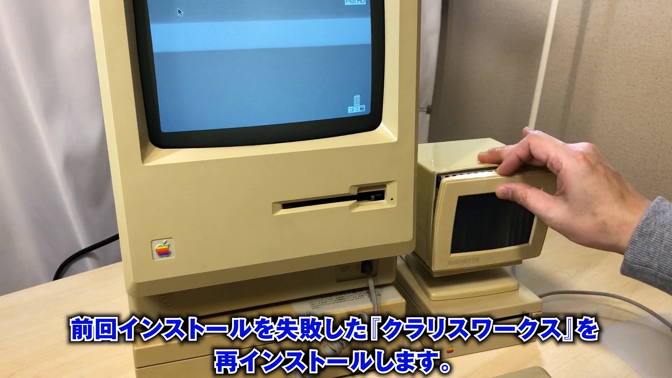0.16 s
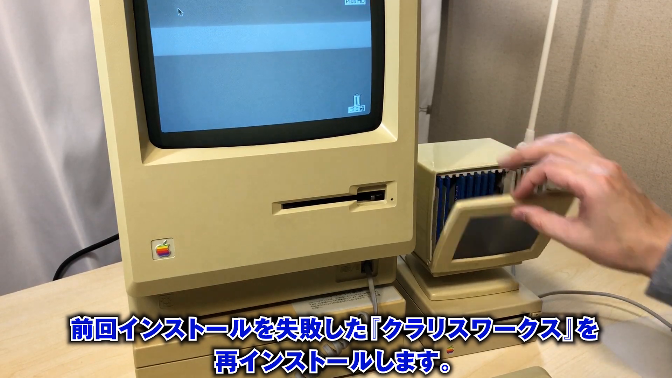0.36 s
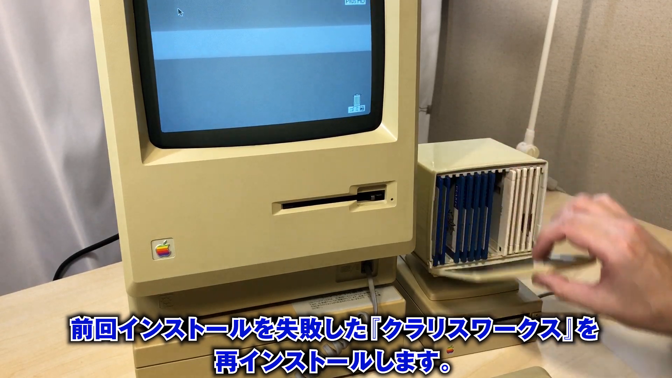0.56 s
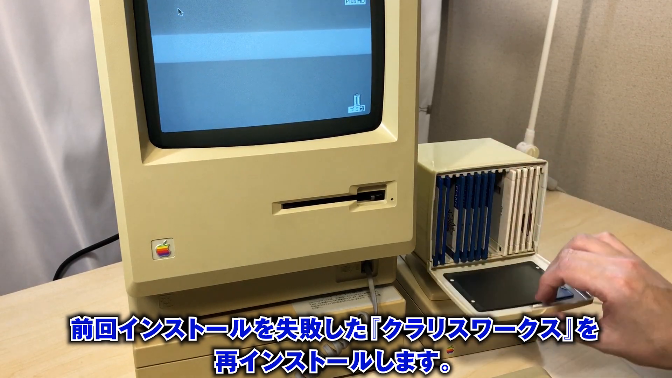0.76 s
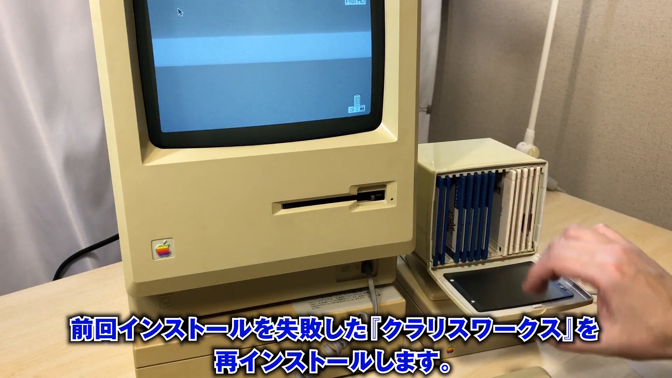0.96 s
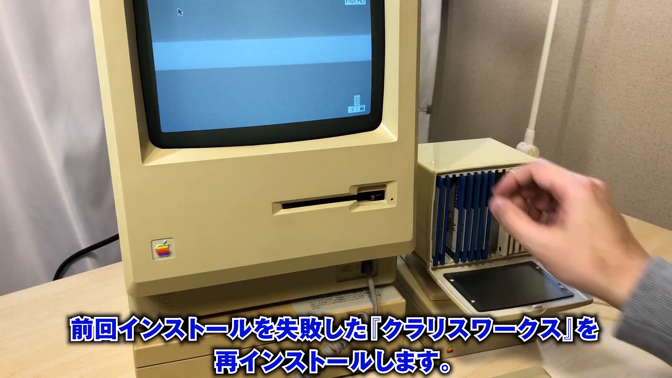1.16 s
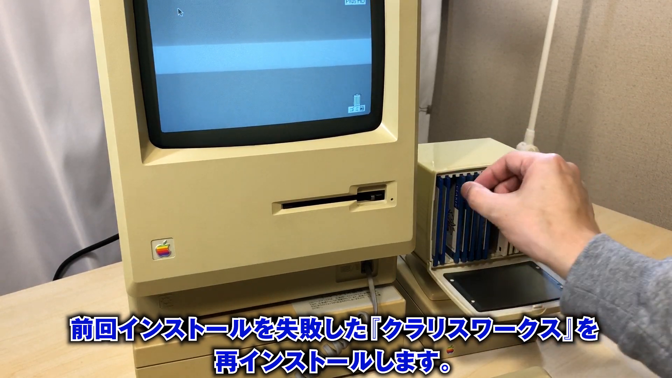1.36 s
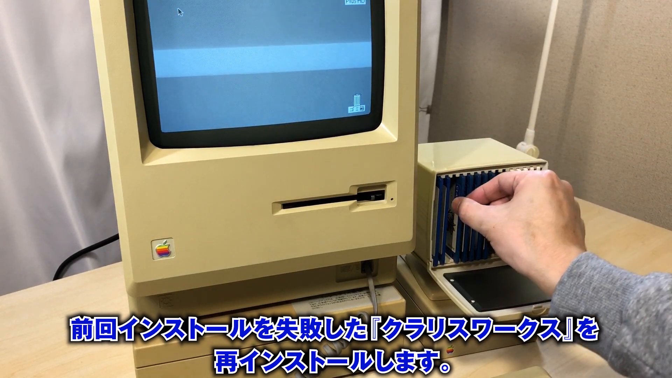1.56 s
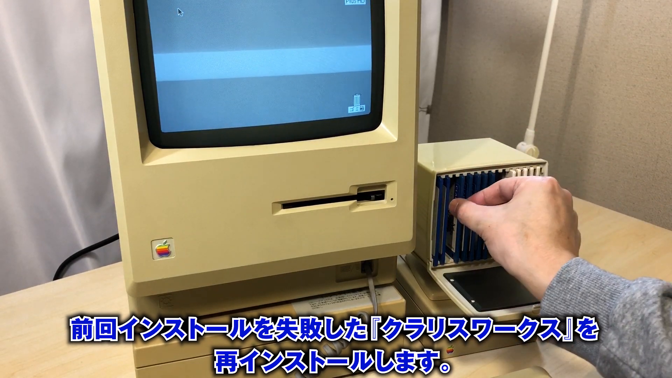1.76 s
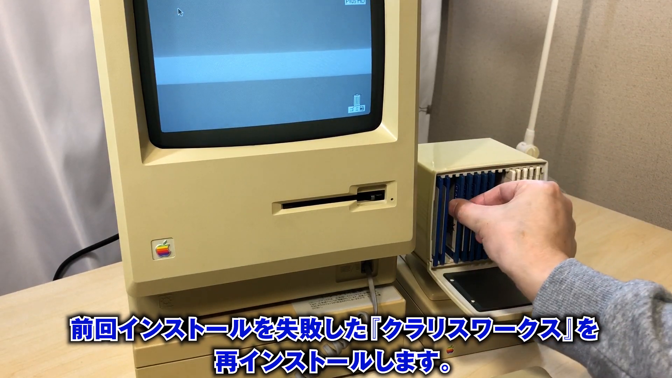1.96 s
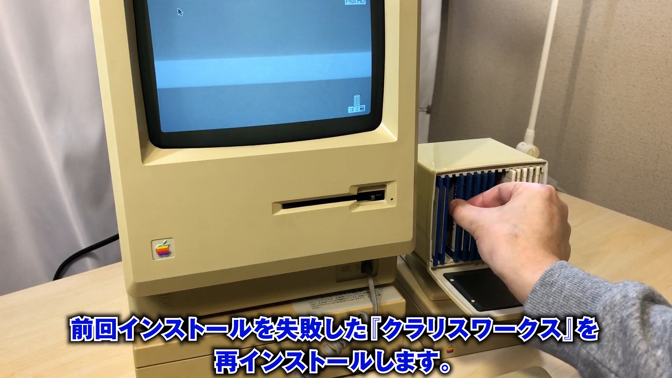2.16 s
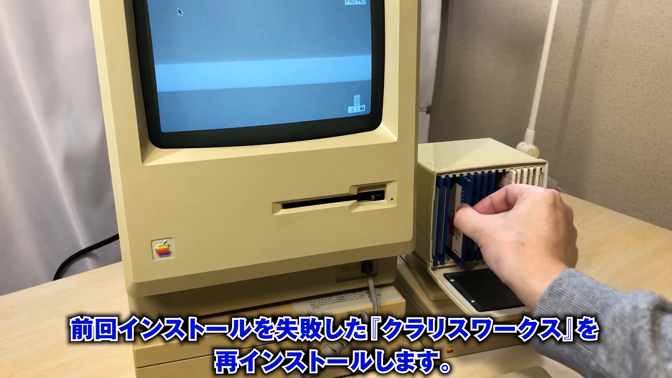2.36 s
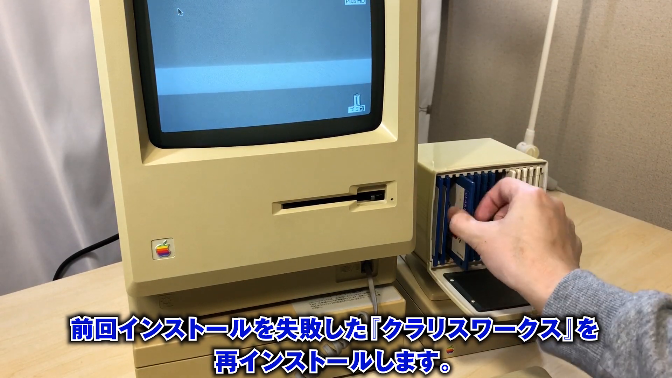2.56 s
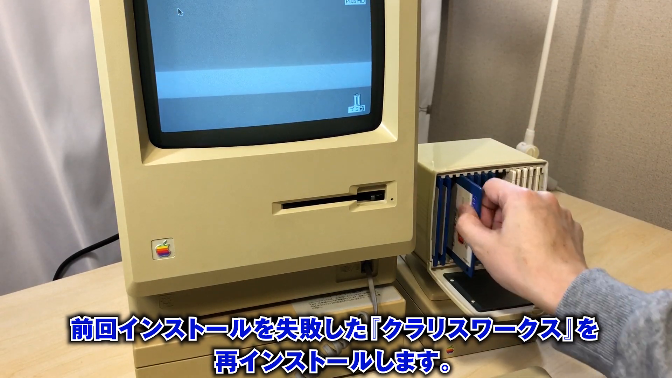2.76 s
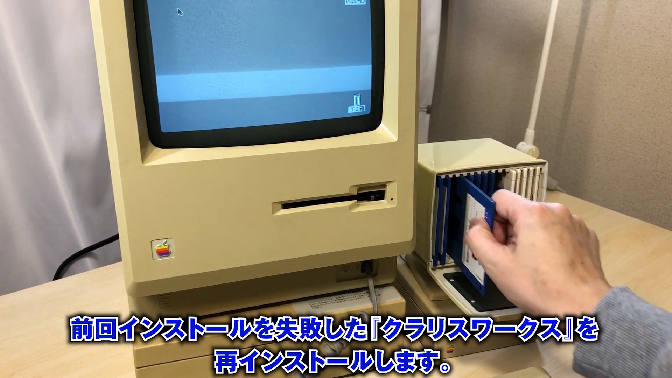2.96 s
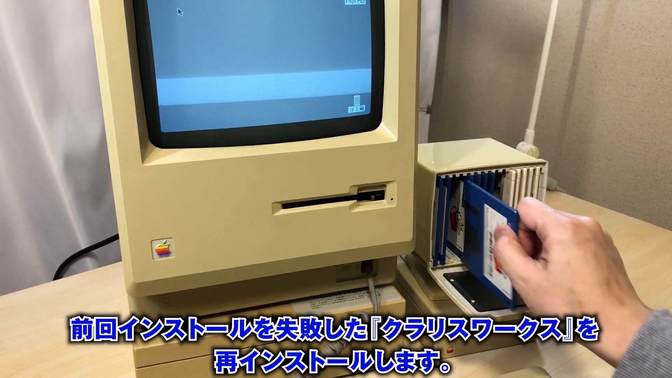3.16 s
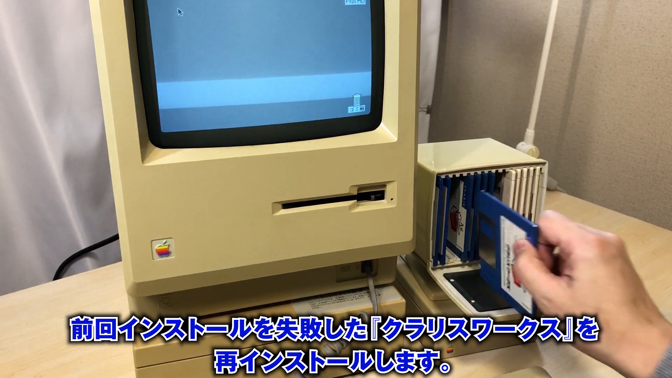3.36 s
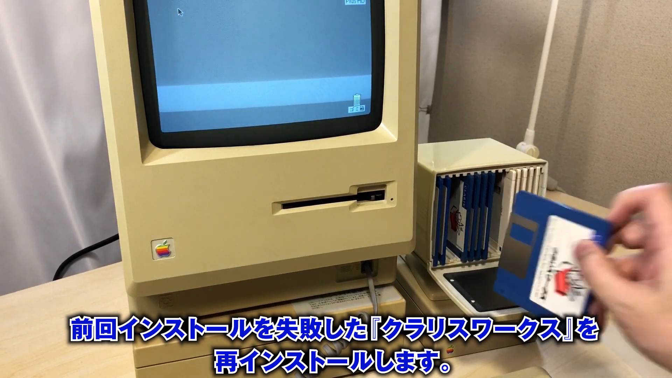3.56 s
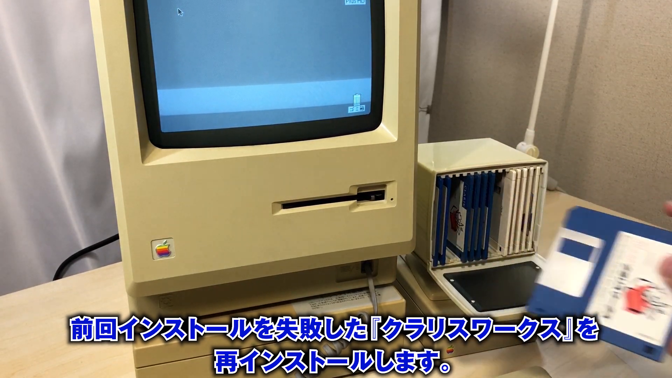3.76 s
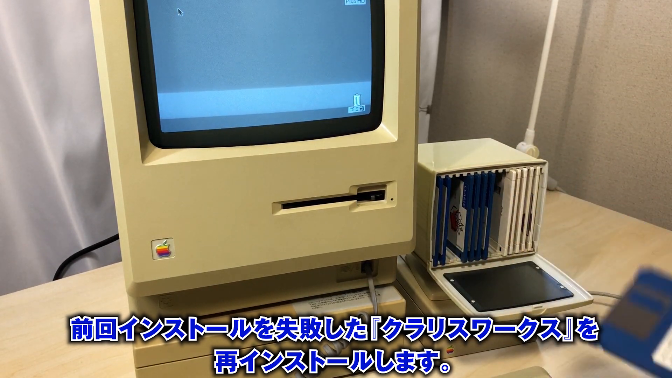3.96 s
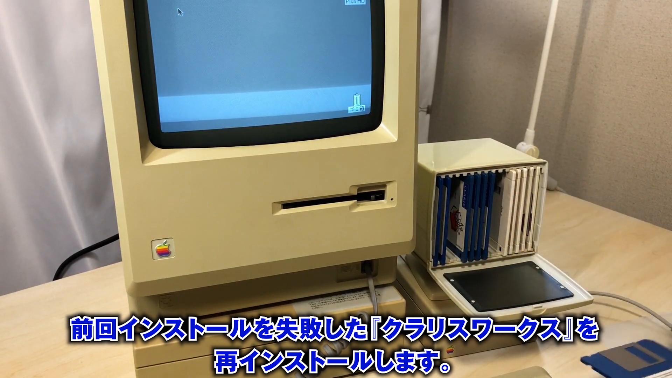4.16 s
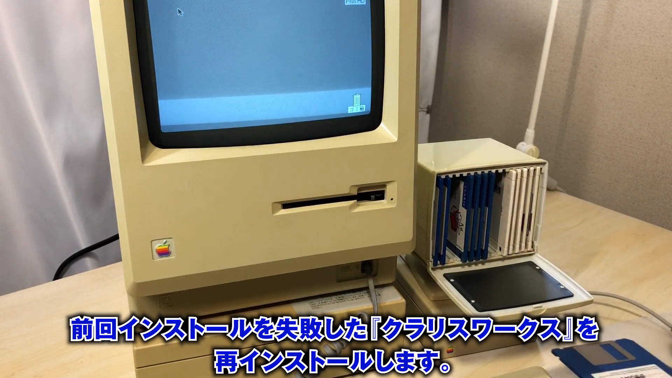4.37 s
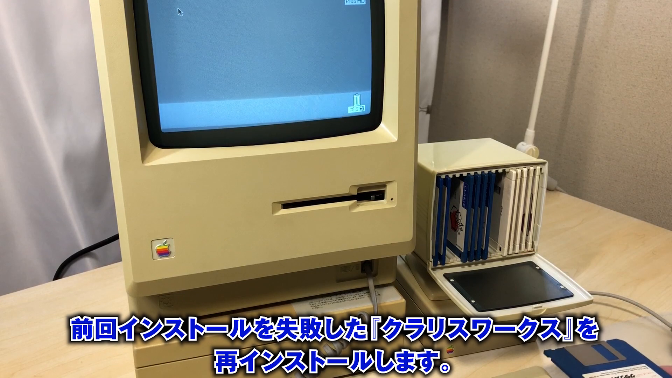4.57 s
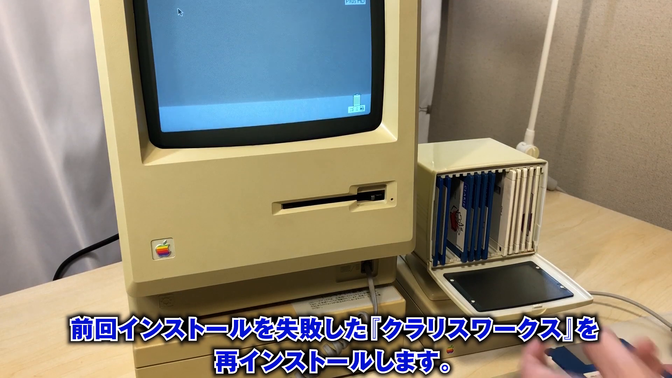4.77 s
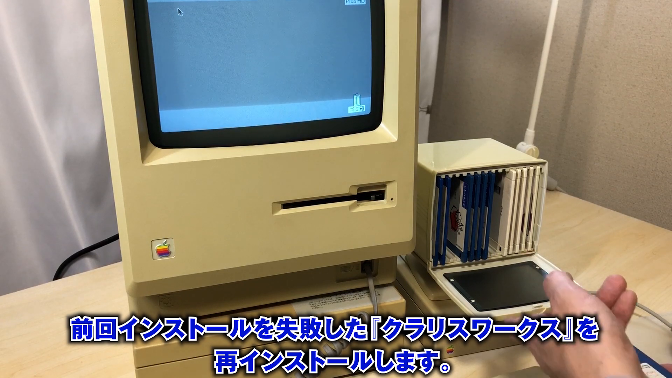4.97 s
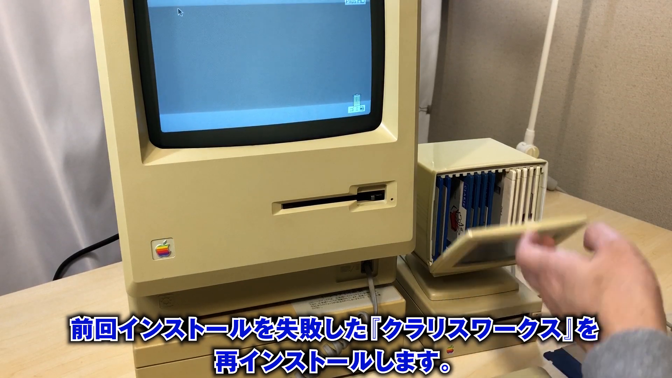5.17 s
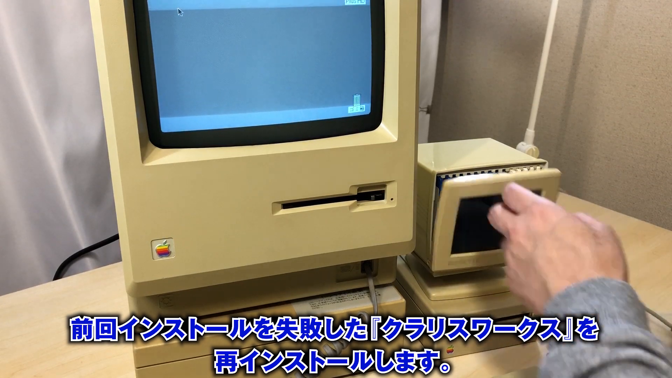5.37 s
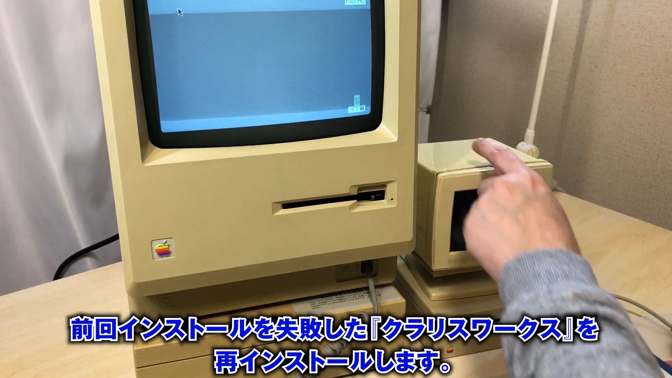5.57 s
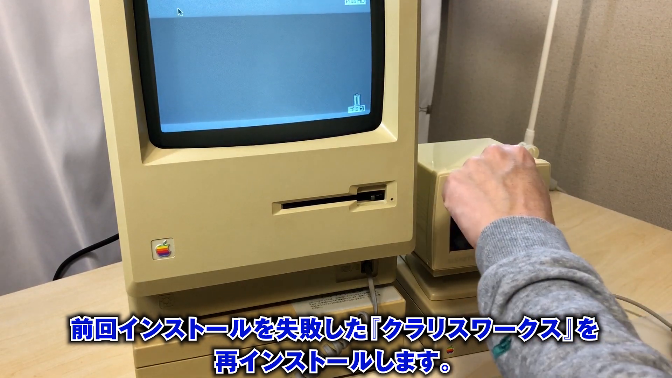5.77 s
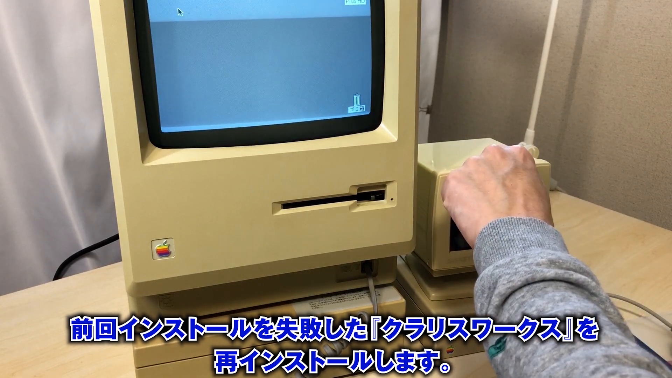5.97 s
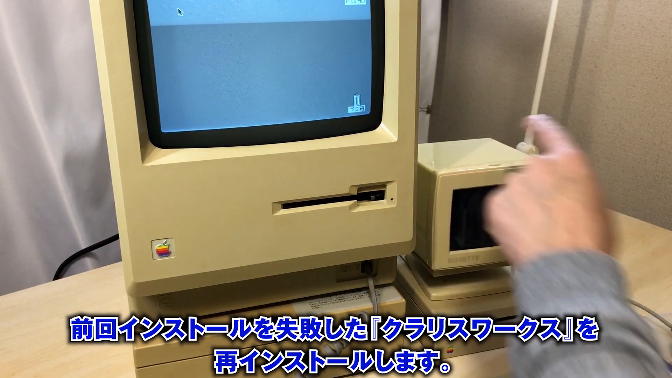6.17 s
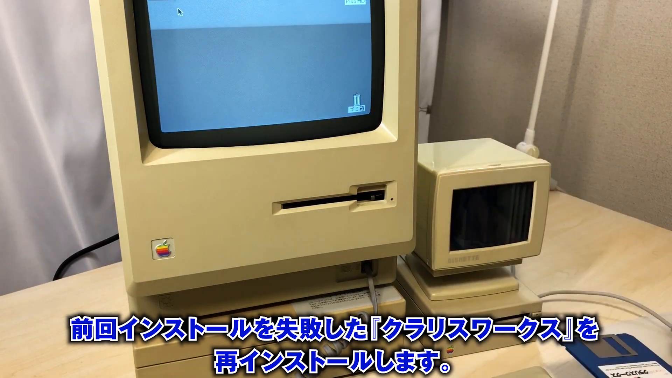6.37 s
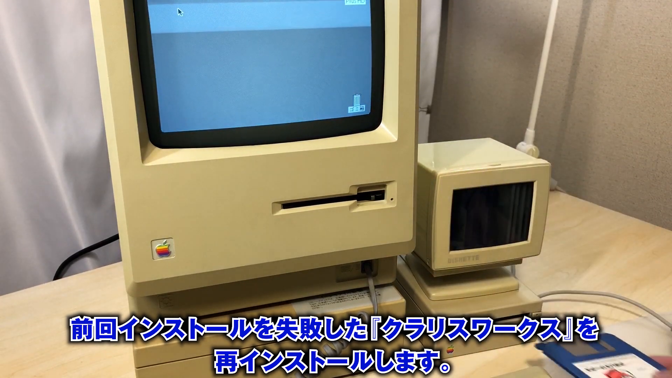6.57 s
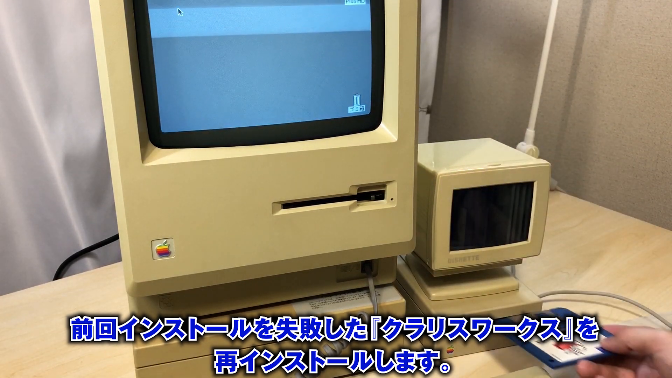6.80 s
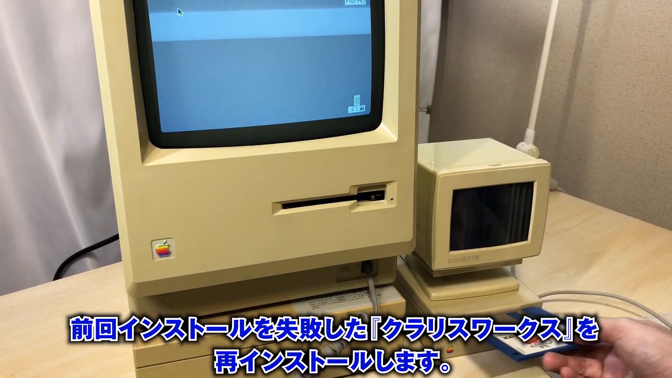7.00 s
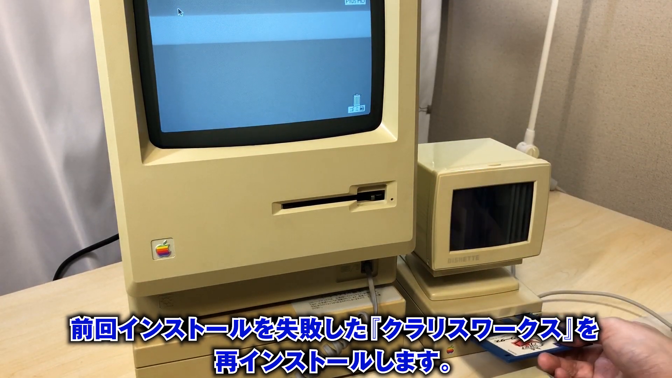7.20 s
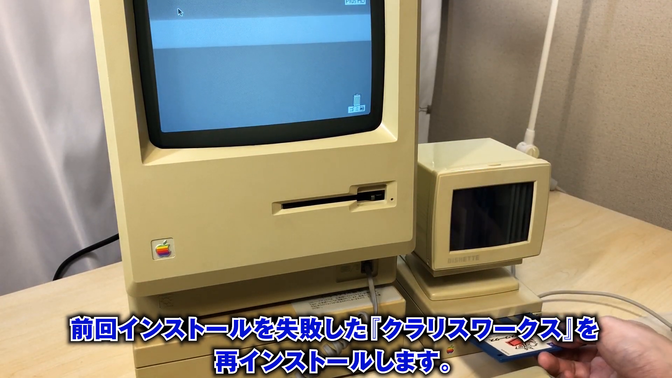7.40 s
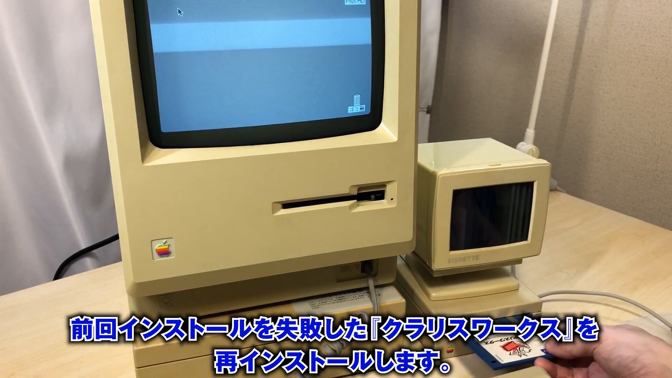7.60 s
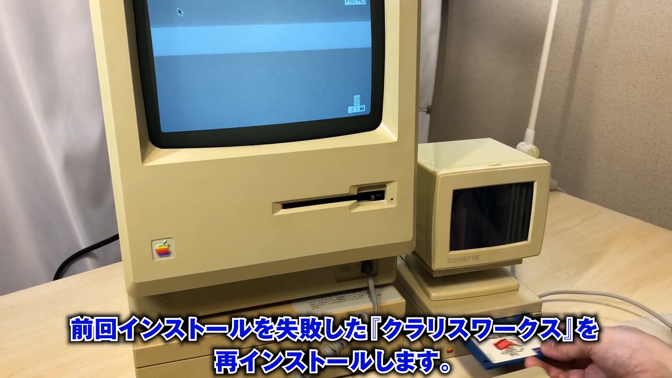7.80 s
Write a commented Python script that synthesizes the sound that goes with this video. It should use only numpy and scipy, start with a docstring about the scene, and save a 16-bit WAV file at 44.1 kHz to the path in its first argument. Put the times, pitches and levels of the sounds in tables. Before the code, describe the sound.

A steady fan and drive hum fills a small quiet room. A plastic disk case pops open at once with a hollow clack, fingers faintly bump and rub the disks, one scrapes and groans out of its tight slot and knocks free loudly, then the lid snaps shut hard. Finally the loose disk lightly taps and slides on the desk. Close stereo microphone, handling slightly to the right.

```python
"""Disk case beside a humming computer

In a small quiet room a plastic floppy disk case has its lid popped open, its disks fingered, one scraped
out and knocked free, and its lid snapped shut; the disk is then slid off the desk top.
Blows are damped modes plus noise bursts, and rubbing is shaped noise with a sine groan at the tight slot.
Fan noise passes through the computer's housing resonances, under the drive's steady tones, throughout.
"""
import sys
import numpy as np
from scipy import signal
from scipy.fft import rfft, irfft, next_fast_len
from scipy.io import wavfile
from scipy.ndimage import uniform_filter1d, map_coordinates

SR = 44100
rng = np.random.default_rng(int(sys.argv[2]) if len(sys.argv) > 2 else 0)


def transcribe(signal):
    """Save signal, clipped to [-1, 1], as a 16-bit WAV file at the path in sys.argv[1]."""
    frames = np.atleast_2d(signal).T
    limited = np.clip(frames, -1, 1)
    pcm = np.round(limited * 32767).astype(np.int16)
    wavfile.write(sys.argv[1], SR, pcm)


N = 345744
TOP_HZ = 15900  # upper band limit of the output

# All levels in the tables are relative; t60_s is the time of a 60 dB decay.
# steady tones of the computer's drive: pitch_hz, level_db
DRIVE_TONES = [(391.5, -50), (540, -79.5), (779, -63.5), (1174, -73), (1438, -66), (1550, -82), (2044, -70),
               (2066, -71.5), (2092, -66), (2348, -68.5), (2821, -73), (2864, -75), (3036, -73),
               (3214, -79), (3618, -79), (3801, -75), (3876, -85), (4204, -76.5), (5701, -75), (5760, -73),
               (8581, -74), (9179, -77), (9238, -83.5)]
# spectrum of the fan air: frequency_hz, density_db
FAN_SPECTRUM = [(20, -11), (38, -4), (75, -4), (150, -7.5), (260, -3.5), (620, -7), (860, -5.5),
                (1000, -9.5), (1800, -13), (3200, -15.5), (4700, -24), (6200, -21), (10500, -29.5),
                (16000, -33)]
# resonances of the computer's housing: centre_hz, width_hz, lift_db
HOUSING_RESONANCES = [(264.8, 28.5, 5), (379, 9.2, 8.5), (420.5, 92, 9.5), (531, 20, 11.5), (736, 136, 6),
                      (2323, 140, 9), (3866, 124, 9), (5230, 390, 7), (8640, 930, 5.5)]
# left-right correlation of the fan air: frequency_hz, correlation (no unit)
FAN_CORRELATION = [(60, 0.35), (130, 0.91), (290, 0.69), (640, 0.96), (1410, 0.86), (3100, 0.82),
                   (6820, 0.76), (15000, 0.58)]
# decay of the room: frequency_hz, t60_s
ROOM_DECAY = [(100, 0.21), (500, 0.26), (2000, 0.25), (8000, 0.23), (15000, 0.17)]

# the lid unlatches, meets the case and latches: start_s, hollow_ring_db, snap_db
LID_CONTACTS = [(0.007, -37, -40.5), (0.0135, -14, -38), (0.033, -22.5, -48), (0.051, -38, -46),
                (0.062, -25.5, -54), (5.511, -27, -39.5), (5.687, -35, -47), (5.738, -29, -39.5),
                (5.7635, -27, -37), (5.776, -27, -58), (5.8175, -21, -40), (5.825, -17.5, -23),
                (5.828, -43, -22), (5.877, -38, -62), (6.111, -40.5, -49.5)]
# hollow modes of the case under the lid and fingertips: pitch_hz, level_db, t60_s
LID_CASE_MODES = [(285.7, -23, 0.26), (368, -4.5, 0.057), (464, -4, 0.055), (549.4, 6.5, 0.054),
                  (583, -5.5, 0.14), (648, 4, 0.0069), (808, -5.5, 0.029)]
# modes of the lid: pitch_hz, level_db, t60_s
LID_WALL_MODES = [(943, -6, 0.031), (1028, -28.5, 0.38), (1290, 2.5, 0.083), (1403, 5.5, 0.03),
                  (1538, 11, 0.028), (1786, 3, 0.031), (2064, 11, 0.026), (2550, -1, 0.026),
                  (2750, -22, 0.15), (3790, -25, 0.1), (4260, -10, 0.1)]
# spectrum of the plastic clack of lid and disks: frequency_hz, density_db
CLACK_SPECTRUM = [(200, -43), (400, 9.5), (900, 2), (2000, -3.5), (3000, -8.5), (4500, -20), (8000, -41),
                  (16000, -52)]
# spectrum of the lid latch's snap and the loose disk's tick: frequency_hz, density_db
SNAP_SPECTRUM = [(800, 11), (2500, -12), (4000, 0), (4800, -0.5), (5700, 4), (6900, 0), (8500, 3.5),
                 (11000, 1), (13500, -3.5), (16000, -17.5)]
# modes of the stand under the case: pitch_hz, level_db, t60_s
STAND_MODES = [(116, -10, 0.21), (140.7, -6, 0.2), (179.3, -6, 0.21), (228, -8, 0.39), (255, 5.5, 0.13)]
# hard pulls and pushes jolt the stand and sway the desk: start_s, thud_db, sway_db
DESK_SHOVES = [(0.014, -53, -51), (3.075, -52, -49.5), (5.823, -27.5, -60)]

# fingertips bump softly on the case: start_s, hollow_ring_db, thud_db
FINGER_BUMPS = [(0.348, -40.5, -57), (0.367, -42.5, -64), (1.067, -52, -64), (1.774, -45.5, -62),
                (1.938, -48, -60), (5.048, -46, -63), (5.345, -47.5, -64), (6.066, -40.5, -52.5),
                (6.116, -48, -52.5), (6.16, -44.5, -53.5)]
# fingertips rub over the disks and the lid: start_s, length_s, friction_db
FINGER_RUBS = [(1.68, 0.45, -58), (2.31, 0.23, -47.5), (5.04, 0.23, -56.5), (5.34, 0.03, -50),
               (6.05, .13, -45.5)]
# spectrum of skin on plastic: frequency_hz, density_db
SKIN_SPECTRUM = [(150, -21), (450, 6.5), (560, 11.5), (700, -3), (1200, -4), (2000, -9), (3500, -20),
                 (8000, -30)]

# plastic rubs on plastic or on the desk: start_s, length_s, friction_db
SCRAPES = [(1.72, 0.075, -57), (1.792, 0.013, -49), (1.831, 0.011, -47), (2.31, 0.1, -55),
           (2.404, 0.029, -44), (2.465, 0.021, -40), (2.638, 0.043, -50.5), (2.70, 0.225, -45.5),
           (2.925, 0.12, -42), (7.105, .024, -48.5)]
# spectrum of that rubbing: frequency_hz, density_db
SCRAPE_SPECTRUM = [(200, -51), (500, 11), (850, 4.5), (1250, 11.5), (1600, 5), (2700, 3.5), (4000, -4),
                   (6000, -4.5), (10000, -12), (13000, -16.5), (16000, -32)]
# shell and shutter brush the rim of the case, and fingers brush the disk: start_s, length_s, friction_db
DISK_BRUSHES = [(2.965, 0.057, -43.5), (3.472, 0.065, -55), (3.54, 0.071, -51.5), (5.16, 0.036, -63),
                (7.39, 0.1, -63), (7.62, 0.23, -62.5)]
# spectrum of the brushing: frequency_hz, density_db
BRUSH_SPECTRUM = [(600, -16), (1600, 8.5), (4000, 4), (7000, 1.5), (12000, -1), (16000, -13)]

# disks knock against each other and the case: start_s, hollow_ring_db, snap_db
DISK_KNOCKS = [(2.237, -51, -59.5), (2.314, -34, -66), (2.456, -24.5, -66), (2.468, -38, -54),
               (2.661, -42.5, -49), (2.692, -34.5, -52), (2.782, -21.5, -51.5), (3.0635, -17.5, -33),
               (3.0708, -11.5, -27.5), (3.092, -21.5, -67), (3.296, -32.5, -38.5), (3.327, -35, -54),
               (3.549, -65, -49), (3.655, -60, -42)]
# hollow modes of the case with a disk pulled: pitch_hz, level_db, t60_s
CASE_MODES = [(303, -13, 0.166), (443, -13.5, 0.26), (534, 11, 0.029), (546.3, 0.5, 0.14),
              (584.6, 2.5, 0.1), (689, 1, 0.062), (735, -9, 0.11)]
# modes of the disks in their slots: pitch_hz, level_db, t60_s
SLOT_MODES = [(1015, -1, .065), (1150, -2, .055), (1236, -3, .035), (1362, -6, .07), (1618, -5, .05),
              (1748, -2, .055), (1990, -2, .055), (2120, -7, .05), (2245, -8, .065), (3350, -8, .045),
              (3900, -10, .035), (5400, -16, .03), (7117, -18, .035)]
# spectrum of a disk edge's click: frequency_hz, density_db
EDGE_SPECTRUM = [(800, -6), (2500, 8), (3900, 9), (4700, 5.5), (5500, 1), (6200, 6), (7100, 2.5), (8000, 2),
                 (10300, 4.5), (12000, -5), (16000, -8)]
# the disk sticks and slips in its slot and shakes the case: start_s, length_s, level_db
SLOT_JUDDERS = [(2.695, .035, -35), (2.805, 0.054, -27)]

# the loose disk taps the desk: start_s, knock_db, tick_db
DESK_TAPS = [(7.048, -37.5, -49), (7.175, -58, -58)]
# the disk drags over the desk: start_s, length_s, level_db
DESK_DRAGS = [(7.08, 0.052, -41)]
# modes of the disk lying on the desk: pitch_hz, level_db, t60_s
DISK_MODES = [(314, -12.5, 0.13), (622, -6, 0.13), (728, -7.5, 0.12), (783, 1.5, 0.059), (960, -6.5, 0.06),
              (1015, -7, 0.049), (1490, -7, 0.023), (2080, -5.5, 0.024)]


def amp(db):
    """Logarithmic level: decibels to amplitude gain."""
    return 10 ** (np.asarray(db) / 20)


def unit(x):
    """Normalisation to an rms of 1."""
    return x / np.sqrt(np.mean(x ** 2) + 1e-20)


def along(points, hz):
    """Interpolation of (frequency, value) points on a logarithmic frequency axis."""
    point_hz, values = np.transpose(points)
    return np.interp(np.log(hz + 1), np.log(point_hz + 1), values)


def columns(rows):
    """Event times, then each decibel column as one gain per event."""
    start_s, *levels = np.transpose(rows)
    return start_s, *amp(levels)[:, :, None]


def place(times, sounds):
    """Superposition of one sound at each time."""
    track = np.zeros(N + SR)
    for start_s, sound in zip(times, sounds):
        track[max(round(start_s * SR), 0):][:len(sound)] += sound
    return track[:N]


def wobble(rate):
    """Slow random modulation: a spline through rate random knots a second."""
    knots = rng.standard_normal(int(N * rate / SR) + 4)
    coarse = np.arange(0, N + 8, 8)  # the spline is evaluated at every eighth sample
    curve = map_coordinates(knots, [coarse * rate / SR])
    return np.interp(np.arange(N), coarse, curve)


def filtered(x, response):
    """Linear filtering: the spectrum of x times a response of frequency."""
    n = x.shape[-1]
    m = next_fast_len(n + 8192)
    return irfft(rfft(x, m) * response(np.fft.rfftfreq(m, 1 / SR)), m)[..., :n]


def noise(spectrum, size):
    """Random excitation coloured by a spectrum, at an rms of 1."""
    return unit(filtered(rng.standard_normal(size), lambda hz: amp(along(spectrum, hz))))


def struck(x):
    """Normalisation of each blow to an rms of 1 over its first hundredth of a second."""
    return x / np.sqrt(np.mean(x[..., :SR // 100] ** 2, axis=-1, keepdims=True) + 1e-20)


def ring(modes, count, attack_s, scatter_db):
    """Modal superposition, one row per blow: damped sines start in phase, each blow at new strengths."""
    t = np.arange(SR // 3) / SR
    waves = np.array([amp(db - 60 * t / t60) * np.sin(2 * np.pi * hz * t) for hz, db, t60 in modes])
    strengths = amp(scatter_db * rng.standard_normal((count, len(modes))))
    return struck(strengths @ waves * (1 - np.exp(-t / attack_s)))


def burst(spectrum, count, t60, tail_db, tail_t60, chatter_db):
    """High modal density heard as noise, one row per blow: a sharp crack over a weaker, uneven rattle."""
    t = np.arange(SR // 3) / SR
    fluctuation = uniform_filter1d(rng.standard_normal((count, len(t))), size=70, axis=1)
    chatter = amp(chatter_db * unit(fluctuation))
    crack = amp(-60 * t / t60)
    rattle = amp(tail_db - 60 * t / tail_t60)
    decay = (crack + rattle) * (1 - np.exp(-t / .0005))
    return struck(noise(spectrum, (count, len(t))) * decay * chatter)


def stand(count):
    """Low structural modes: the dull thud of the stand under the case, one row per blow."""
    return ring(STAND_MODES, count, attack_s=.006, scatter_db=1)


def radiated(x, low_hz):
    """Radiation efficiency: small parts radiate poorly in the bass, so a highpass applies."""
    return signal.sosfilt(signal.butter(2, low_hz, "highpass", fs=SR, output="sos"), x)


def contacts(rows, edge_share):
    """Blow times and gains; the clack lies between hollow ring (share 0) and snap (share 1) in decibels."""
    start_s, hollow, snap = columns(rows)
    return start_s, hollow, hollow * (snap / hollow) ** edge_share, snap


def strokes(rows, attack_s, release_t60):
    """Friction envelope per sample: each stroke builds up, holds, then decays exponentially."""
    t = np.arange(N) / SR
    gain = np.zeros(N)
    for start, length, db in rows:
        build = np.clip((t - start) / attack_s, 0, 1)
        release_db = 60 * np.clip((t - start - length) / release_t60, 0, 2)
        gain += build * amp(db - release_db)
    return gain


def in_room(x, wet_db, apart):
    """Reverberation: direct sound, treble glancing off the desk unlike left and right, and a diffuse tail."""
    hz, t, z = signal.stft(rng.standard_normal((2, SR // 2)), SR, nperseg=256)
    decay = amp(-60 * t / along(ROOM_DECAY, hz)[:, None])
    tails = signal.istft(z * decay, SR, nperseg=256)[1]
    tails = np.pad(tails / np.linalg.norm(tails[0]), ((0, 0), (SR // 250, 0)))  # the tail starts 4 ms late
    mid, side = amp(wet_db) * signal.fftconvolve(x[None], tails, axes=1)[:, :len(x)]
    # a 4 ms burst of short reflections, opposite in sign between the channels
    glance = noise([(300, -4), (1200, -10), (4000, 3), (16000, -2.5)], size=180)
    glancing = signal.fftconvolve(x, glance / np.linalg.norm(glance))[:len(x)]
    side = apart * side + amp(-12) * glancing
    return np.array([x + mid + side, x + mid - side])


def computer():
    """Resonant filtering: fan noise through the housing, under the slightly unsteady tones of the drive."""
    # a random fine ripple over frequency roughens the treble of the fan noise
    ripple_points = rng.standard_normal(1000)

    def air_response(hz):
        lift = sum(db / (1 + (2 * (hz - centre) / width) ** 2) for centre, width, db in HOUSING_RESONANCES)
        depth_db = np.interp(hz, [600, 2500, 9000, 12000], [0, 2.4, 2.4, .8])
        ripple = np.interp(hz, np.linspace(0, SR / 2, len(ripple_points)), ripple_points) * depth_db
        # the mid-side angle that gives the left-right correlation
        turn = np.arccos(np.clip(along(FAN_CORRELATION, hz), -1, 1)) / 2
        return amp(along(FAN_SPECTRUM, hz) + lift + ripple) * np.array([np.cos(turn), np.sin(turn)])

    mid, side = filtered(rng.standard_normal((2, N)), air_response)
    air = amp(-51.5) * unit(np.array([mid + side, mid - side]))
    clock = np.cumsum(1 + .0008 * wobble(9)) / SR  # all tones share one unsteady speed
    tones = np.zeros(N)
    for hz, db in DRIVE_TONES:
        level = np.sqrt(2) * amp(db - 1.5 + 1.5 * wobble(11))
        tones += level * np.sin(2 * np.pi * hz * clock)
    return air * amp([[.3], [-.3]]) + tones * amp([[.7], [-.7]])


def lid():
    """Impact excitation: contacts ring the hollow case, clack the lid, snap the latch and thud the stand."""
    s, hollow, clack, snap = contacts(LID_CONTACTS, edge_share=0.4)
    n = len(s)
    blows = hollow * ring(LID_CASE_MODES, n, attack_s=.003, scatter_db=1)
    blows += clack * amp(-7.5) * ring(LID_WALL_MODES, n, attack_s=0.0013, scatter_db=4.0)
    blows += clack * amp(-5.5) * burst(CLACK_SPECTRUM, n, t60=0.16, tail_db=-6.0, tail_t60=0.22, chatter_db=3.0)
    blows += snap * burst(SNAP_SPECTRUM, n, t60=0.029, tail_db=-11, tail_t60=0.11, chatter_db=1.5)
    blows += clack * amp(-33) * stand(n)
    return in_room(radiated(place(s, blows), low_hz=190), wet_db=-10.5, apart=0.37)


def sway():
    """Lowest-mode response: a shove thuds in the stand while the desk's sway builds up and dies away."""
    s, thud, size = columns(DESK_SHOVES)
    t = np.arange(SR * 3 // 4) / SR
    sway_hz, sway_t60, build_s = 43, .5, .049
    swing = np.sin(2 * np.pi * sway_hz * t) * amp(10 - 60 * t / sway_t60) * (1 - np.exp(-t / build_s))
    thuds = radiated(place(s, thud * stand(len(s))), low_hz=148)
    return place(s, size * swing) + in_room(thuds, wet_db=-17, apart=0.26)


def fingers():
    """Soft contact: skin rubs dully and unevenly; its bumps wake only low modes of the case and stand."""
    uneven = amp(6.1 * wobble(110))
    rub = strokes(FINGER_RUBS, attack_s=0.0055, release_t60=0.081) * unit(uneven * noise(SKIN_SPECTRUM, N))
    s, hollow, thud = columns(FINGER_BUMPS)
    bumps = hollow * ring(LID_CASE_MODES, len(s), attack_s=.004, scatter_db=1)
    bumps += thud * stand(len(s))
    return in_room(rub + place(s, bumps), wet_db=-8.5, apart=0.22)


def sliding():
    """Dry friction: tiny slips and sparse catches scrape and brush along the disk."""
    grain = amp(2.2 * wobble(900) + 2 * wobble(90))
    catches = (rng.random(N) < 130 / SR) * rng.uniform(.3, 1, N)  # about 130 a second
    grit = amp(-5) * unit(filtered(catches, lambda hz: amp(along(SCRAPE_SPECTRUM, hz))))
    rough = unit(unit(grain * noise(SCRAPE_SPECTRUM, N)) + grit)
    scrape = strokes(SCRAPES, attack_s=0.0054, release_t60=0.03) * rough
    smooth = unit(grain * noise(BRUSH_SPECTRUM, N))
    brush = strokes(DISK_BRUSHES, attack_s=0.009, release_t60=0.12) * smooth
    return in_room(scrape + brush, wet_db=-8.5, apart=0.21)


def knocks():
    """Impact excitation: a disk's edge clicks, its shell clacks, and the hollow case and stand answer."""
    s, hollow, clack, snap = contacts(DISK_KNOCKS, edge_share=0.39)
    n = len(s)
    blows = hollow * ring(CASE_MODES, n, attack_s=.0025, scatter_db=1)
    blows += clack * amp(-1.5) * ring(SLOT_MODES, n, attack_s=0.0024, scatter_db=5.0)
    blows += clack * amp(-1.5) * burst(CLACK_SPECTRUM, n, t60=0.057, tail_db=-6, tail_t60=0.17, chatter_db=0.5)
    blows += snap * burst(EDGE_SPECTRUM, n, t60=0.026, tail_db=-12, tail_t60=0.1, chatter_db=3.0)
    blows += clack * amp(-32) * stand(n)
    return in_room(radiated(place(s, blows), low_hz=230), wet_db=-12.0, apart=0.44)


def judder():
    """Stick-slip locking: in the tight slot, slips lock onto the case's main mode as an unsteady groan."""
    groan_hz = 543
    phase = 2 * np.pi * groan_hz * np.arange(N) / SR + .7 * wobble(150)
    groan = np.sin(phase) * amp(2.8 * wobble(160))
    return strokes(SLOT_JUDDERS, attack_s=0.015, release_t60=0.13) * unit(groan)


def loose_disk():
    """Modal response to taps and friction: the disk taps the desk and is dragged towards its edge."""
    s, knock, tick = columns(DESK_TAPS)
    body = ring(DISK_MODES, len(s), attack_s=.0006, scatter_db=1.5)
    # random friction excites the same modes as the first tap
    rubbed = unit(signal.fftconvolve(rng.standard_normal(N), body[0])[:N])
    drag = strokes(DESK_DRAGS, attack_s=0.013, release_t60=0.064) * rubbed
    taps = knock * body
    taps += tick * burst(SNAP_SPECTRUM, len(s), t60=0.018, tail_db=-18, tail_t60=.08, chatter_db=1.5)
    return in_room(drag + place(s, taps), wet_db=-10.5, apart=0.32)


def scene():
    """Level panning: the case stands to the right of the computer."""
    handling = lid() + fingers() + sliding() + knocks() + judder() + loose_disk()
    return computer() + handling * amp([[-1.1], [1.1]]) + sway()


def record(dry):
    """Soft saturation rounds off the highest peaks; a band limit then removes all above TOP_HZ."""
    rounded = dry / (1 + np.abs(dry / .97) ** 8) ** (1 / 8)
    return filtered(rounded, lambda hz: hz < TOP_HZ)


dry = scene()
out = record(dry)
transcribe(out)
```